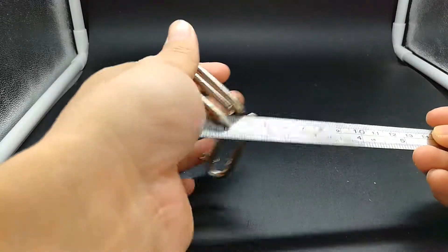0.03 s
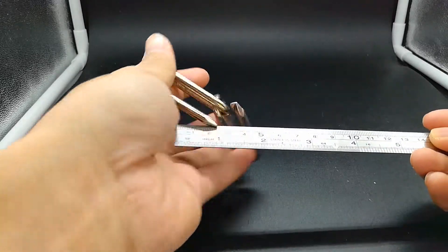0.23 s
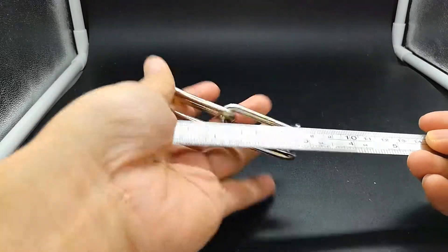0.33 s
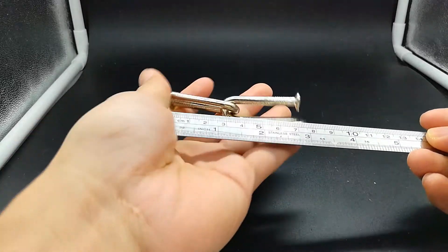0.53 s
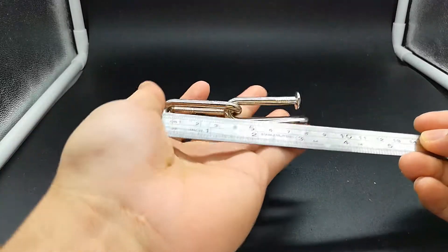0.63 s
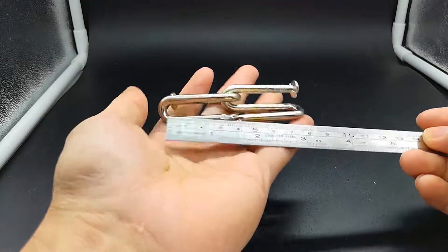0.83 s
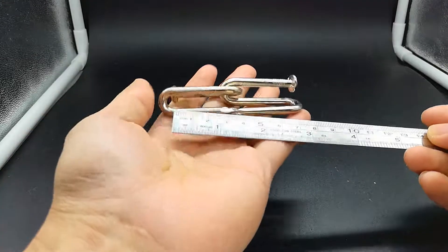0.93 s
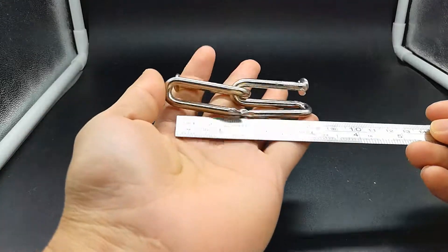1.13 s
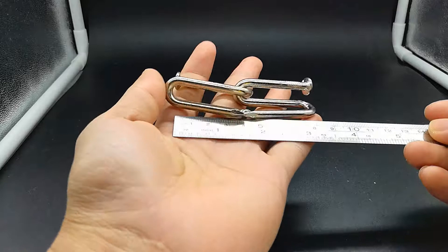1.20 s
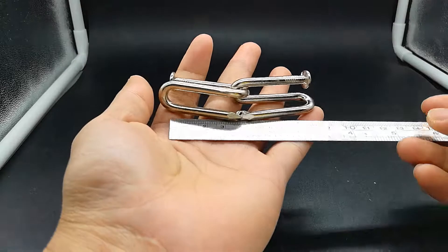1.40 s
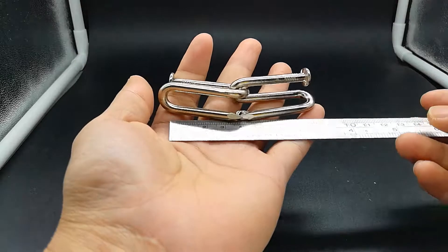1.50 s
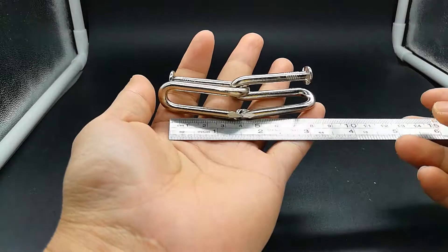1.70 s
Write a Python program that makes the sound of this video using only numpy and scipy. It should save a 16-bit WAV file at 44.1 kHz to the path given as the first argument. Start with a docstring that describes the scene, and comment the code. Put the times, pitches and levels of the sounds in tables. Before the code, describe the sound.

Close stereo pickup in a small, fairly dry space: thin gritty metal scrapes, a rapid burst of high steel clinks with short ringing, a few last scrapes, then quiet skin rubbing and dull bumps on a mat.

```python
"""Two linked steel puzzle loops are tipped onto a palm beside a steel ruler, close up in a small padded booth.
First they scrape along the ruler: tiny noisy slips hiss and keep the steel ringing.
Then they clink together and tap the ruler (sharp cracks and fading tones), with a few last scrapes.
Then the hand slides over the mat: shaped noise rustles, swishes and rubs, with a few dull bumps that die away.
A low uneven rumble and faint steady room noise lie underneath from start to end."""
import sys
import numpy as np
from scipy import signal
from scipy.fft import rfft, irfft
from scipy.io import wavfile

SR = 44100
rng = np.random.default_rng(int(sys.argv[2]) if len(sys.argv) > 2 else 0)


def bounce(signal):
    """Save signal as a 16-bit WAV file at the path given by the first command-line argument."""
    frames = np.transpose(np.atleast_2d(signal))
    limited = np.clip(frames, -1, 1)
    pcm = np.round(limited * 32767).astype(np.int16)
    wavfile.write(sys.argv[1], SR, pcm)


N = 77175  # length in samples

# In all tables, t60_s is the time to fade by 60 dB and balance_db is left minus right.
# Ringing tones of each piece of steel, before each blow scales their length and scatters their pitch:
# pitch_hz, level_db, t60_s, balance_db
HELD_LOOP_TONES = [(3990, -9.5, 0.18, -0.5), (5640, -7.5, 0.17, -7.5), (6960, -7.5, 0.14, -10.5),
                   (7470, -1, 0.0598, -10), (7530, 5.5, 0.0645, -9), (7620, -8, .08, -12.5),
                   (9243, -2, .12, -7.5), (9545, 2.5, 0.13, -6.5), (9400, -6, .08, -8),
                   (11550, -6, 0.035, -2), (12500, -9.5, .1, -4.5), (13880, -4.5, .08, 0),
                   (13960, -12.5, 0.039, 5), (15675, -7, .13, 7.5)]
SWINGING_LOOP_TONES = [(4114, -15.5, .13, -7), (5820, -1, 0.042, -12), (6950, -12.5, .07, -11.5),
                       (6990, 4.5, .075, -13), (9170, -10, 0.0992, -6), (9800, -1, .065, 3.5),
                       (9910, -6.5, 0.091, 0), (9960, -9, .07, -1), (10330, -15, .09, 0),
                       (12672, -8, 0.14, -10.5), (13690, -17.5, .08, -4.5), (13880, -10, .1, 2.5),
                       (15740, -10, .13, 2)]
SHANK_TONES = [(3840, -17.5, 0.047, 2), (6925, -2, 0.074, -10), (7200, -8, .04, -11.5),
               (9230, -6.5, 0.12, -4.5), (9530, -3, 0.021, -3), (10200, 5, 0.013, 2),
               (13690, -14.5, .07, -2), (13910, -13, .06, -3)]  # the short knobbed shank
RULER_TONES = [(1420, -2.5, 0.037, 2.5), (2122, -8.5, 0.043, 1), (2690, -7.5, 0.031, 1),
               (3686, 4.5, .04, -1), (4437, -8, 0.055, -2), (4820, -7, 0.037, -4.5), (5620, -4, 0.064, -15),
               (7020, -7, 0.15, -6.5), (7200, -4.5, 0.065, -11.5), (7280, -1, 0.083, -9.5),
               (7780, -1, .055, -13.5), (8570, -11, .07, -11), (9680, 2, .045, -10),
               (11350, 7.5, 0.044, -4), (14100, -9, .09, 2.5)]
SCRAPE_TONES = [(2030, -10.5, .05, 7.5), (2800, -11.5, .05, -3.5), (3620, -4, .06, -3),
                (4344, 0, 0.036, -0.5), (4500, 2, .045, -7.5), (5020, -1.5, 0.066, -7.5),
                (5765, -6, 0.055, -15), (6500, -3.5, .05, -9.5), (6953, -2, .05, -6.5),
                (7080, 0.5, 0.12, -8), (7520, -2.5, 0.0506, -10.5), (7872, -6.5, .05, -7),
                (8500, -3.5, .05, -8), (11505, -10, 0.054, -2)]  # tones that sliding keeps alive
# Blows of steel on steel: start_s, held_loop_db, swinging_loop_db, shank_db, ruler_db, crack_db,
# ring_length_share, ring_brightness_db_per_octave, crack_brightness_db_per_octave
CONTACTS = [(0.1975, -75, -77, -37, -71.5, -41.5, 1.0, 2, 0.5),
            (0.2204, -50.5, -62, -48, -68.5, -43.5, 0.93, 0.5, -3),
            (0.2252, -31, -61.5, -48, -57, -27.5, 0.87, 3.5, 6.5),
            (0.2338, -47.5, -42.5, -46, -69, -41, 0.37, 2.5, -7.5),
            (0.255, -50.5, -43, -58, -66, -33.5, .7, 0, 3.5),
            (0.2575, -50.5, -28, -50, -69.5, -39.5, .85, 1.5, 8.5),
            (0.269, -60, -44, -43, -68.5, -41.5, .7, 8, -2.5),
            (0.2953, -53, -35.5, -48, -53, -26.5, .7, -3, 1.5),
            (0.3005, -78, -69, -71, -57.5, -57.5, 0.21, 1, -10.5),
            (0.3174, -53, -53, -43, -67.5, -36, 0.69, -0.5, -0.5),
            (0.3838, -82, -81, -64, -41, -33, 0.96, -1, 0.5)]
# Colour of the crack: pitch_hz, level_db
CRACK_COLOUR = [(20, -110), (250, -47.5), (550, -33.5), (1000, -20.5), (2000, -15), (3000, -7),
                (4700, -3.5), (7500, 3.5), (8600, -3.5), (9600, 0), (12000, -2.5), (14500, -10),
                (16500, -16.5)]
# Steel sliding on steel: start_s, attack_s, release_s (fall of 60 dB), level_db, brightness_db_per_octave
SCRAPES = [(-.01, 0.0083, 0.23, -52.5, -2.5), (0.037, 0.0037, 0.055, -50.5, 0),
           (0.113, .014, 0.061, -55, -0.5), (0.131, 0.0062, 0.18, -53, -1), (0.326, 0.033, 0.12, -57.5, -5),
           (0.404, 0.041, .13, -55, -2), (.445, 0.028, 0.053, -57.5, 13)]
# Colour of the scraping hiss: pitch_hz, level_db
SCRAPE_COLOUR = [(20, -100), (400, -31.5), (1400, -24.5), (1750, -29), (2030, -4.5), (2300, -20.5),
                 (3300, -10.5), (4000, -4), (4400, -3.5), (4750, -7), (6000, -1.5), (7200, -0.5),
                 (8500, -5.5), (11500, -8.5), (16000, -23.5)]
# Left-right balance of the steel noise: pitch_hz, balance_db
STEEL_BALANCE = [(1000, 1), (2100, 0), (2800, 1.5), (4500, -9), (6200, -10), (8300, -11.5), (9800, -2.5),
                 (12000, -0.5), (14500, 0)]
# Rustle of the hand sliding over the mat: time_s, level_db
RUSTLE_LEVEL = [(.7, -97.5), (.77, -73.5), (.88, -69), (.96, -66), (1.0, -63.5), (1.03, -58.5),
                (1.12, -61.5), (1.21, -67), (1.29, -65), (1.38, -68), (1.43, -81.5), (1.5, -86),
                (1.57, -76), (1.68, -94)]
# Colour of the rustle: pitch_hz, level_db
RUSTLE_COLOUR = [(400, -38), (720, -14), (880, -15), (1030, -3), (1260, -1), (1420, -4), (1600, -3),
                 (2000, -10.5), (2350, -17.5), (2750, -26), (3400, -25), (4400, -31.5), (6000, -37)]
# Narrow band that sings within the rustle: time_s, pitch_hz, level_db
SWISH = [(.75, 1000, -93.5), (.9, 1051, -76.5), (1.05, 1170, -72.5), (1.22, 1150, -79.5), (1.26, 1066, -63),
         (1.3, 1172, -68.5), (1.43, 1209, -71), (1.49, 981.5, -78), (1.53, 1051, -75.5), (1.57, 1107, -73),
         (1.62, 1304, -74), (1.68, 1355, -95.5)]
# Soft brush as the hand meets the mat and drags on: time_s, level_db
BRUSH_LEVEL = [(.64, -100), (.68, -77.5), (.75, -73.5), (.81, -70), (.88, -73.5), (.95, -86.5), (1.1, -83),
               (1.25, -96), (1.35, -83), (1.47, -83.5), (1.6, -94)]
# Colour of the brush: pitch_hz, level_db
BRUSH_COLOUR = [(100, -15), (250, -5), (470, 6.5), (620, 0.5), (800, -6.5), (1100, -11.5), (1650, -14),
                (2500, -21.5), (3200, -9.5), (6000, -43.5)]
# Hollow rubbing of the hand: time_s, pitch_hz, level_db
RUB = [(0, 168.1, -84.5), (.24, 150.3, -77), (.29, 150.6, -68), (.36, 185.2, -66), (.42, 229.7, -86.5),
       (.62, 190.5, -86), (.7, 179.7, -68.5), (.8, 184.9, -71), (.88, 160.1, -104), (1.02, 179.7, -74),
       (1.13, 169.7, -72.5), (1.23, 238.1, -67.5), (1.33, 290.8, -65), (1.41, 260.4, -77),
       (1.5, 229.7, -72.5), (1.58, 169.8, -75.5), (1.72, 160, -90.5)]
# Dull bumps on the table: start_s, pitch_hz, level_db, t60_s
BUMPS = [(0.828, 52.7, -51.5, .2), (1.117, 136, -59, 0.15), (1.309, 132.5, -58.5, .14),
         (1.54, 75.8, -48.5, 0.1)]
# Low rumble: time_s, level_db
RUMBLE_LEVEL = [(0.0, -59.5), (0.072, -58), (0.146, -80), (0.184, -69), (0.516, -80), (0.544, -62),
                (0.666, -87), (0.764, -59.5), (1.038, -64.5), (1.066, -55.5), (1.272, -62), (1.456, -88),
                (1.554, -55.5), (1.676, -82), (1.706, -68), (1.75, -67)]
# Colour of the steady room noise: pitch_hz, level_db
FLOOR_COLOUR = [(15, -32), (25, -1), (64, -3), (108, -8.5), (157, -11), (229, -10.5), (607, -31),
                (1440, -25), (1560, -20.5), (2160, -34), (5880, -39), (8360, -33), (9570, -46),
                (11000, -41), (16000, -49)]
# Width of the room noise: pitch_hz, side_minus_mid_db
FLOOR_SIDE = [(60, -19.5), (110, -20), (200, -19), (380, -9), (700, 2.5), (1290, -18), (2380, -1),
              (4400, 0), (8120, -1), (15000, 2)]

RING_RISE_S, CRACK_RISE_S, CRACK_T60_S = 0.00091, 0.002, 0.046
PITCH_SCATTER = 0.0017  # largest random detuning per blow, as a share of the pitch
TWIN_SPLIT, TWIN_DB = 0.007, -5.5  # largest pitch gap (share) and level of the beating twin
MIC_PHASE_TURNS, MIC_PHASE_HZ = (-0.324, 0.243), 8000  # random phase range per microphone at this pitch
SCRAPE_GRAINS_PER_S, SCRAPE_SCATTER_DB, SCRAPE_RING_DB = 3100, 0.5, -2
RUSTLE_GRAINS_PER_S, RUSTLE_SCATTER_DB = 12000, 2
STEEL_LIKENESS, RUSTLE_LIKENESS = 0.4, 0.9  # share of noise power common to both microphones
SWISH_WIDTH_HZ, RUB_WIDTH_HZ = 230, 61
RUMBLE_HZ, RUMBLE_WIDTH_HZ = 47.3, 18
FLOOR_DB = -73
BOOTH_DB, BOOTH_T60_S, ROOM_DB, ROOM_T60_S = -7.5, 0.07, -23, 0.43
STEEL_LEAD_S, HAND_LEAD_S = 0.00013, 0.00009  # how much later the right side hears it
TOP_HZ = 15850


def undb(db):
    """Turn decibels into a gain."""
    return 10 ** (np.asarray(db) / 20)


def unit(x):
    """Scale a sound to rms 1."""
    return x / np.sqrt(np.mean(x ** 2) + 1e-30)


def clock():
    """Give the time of each sample in seconds."""
    return np.arange(N) / SR


def bins():
    """Give the pitch in Hz of each step of the spectrum."""
    return np.fft.rfftfreq(N, 1 / SR)


def curve(rows, axis=1):
    """Join one column of a table by straight lines in time."""
    rows = np.array(rows)
    return np.interp(clock(), rows[:, 0], rows[:, axis])


def on_bins(points):
    """Spread (pitch_hz, level_db) points over the whole spectrum."""
    hz, db = np.array(points).T
    return np.interp(np.log(bins() + 1), np.log(hz), db)


def colour(x, points, tilt_db=0):
    """Give a sound a spectrum, tilted in dB per octave, at rms 1."""
    octaves = np.log2(bins() + 1)
    return unit(irfft(rfft(x) * undb(on_bins(points) + tilt_db * octaves), N))


def sides(db):
    """Find left and right gains that keep the power for a level difference."""
    gains = undb(np.array([[.5], [-.5]]) * db)
    return gains / np.sqrt(np.mean(gains ** 2, axis=0))


def spread(likeness):
    """Make noise at two microphones, partly shared."""
    shared = rng.standard_normal(N)
    separate = rng.standard_normal((2, N))
    return np.sqrt(likeness) * shared + np.sqrt(1 - likeness) * separate


def grains(rate, scatter_db, likeness):
    """Make rough sliding out of dense tiny slips of uneven size."""
    noise = spread(likeness)
    happens = rng.random(N) < rate / SR
    return noise * happens * undb(scatter_db * rng.standard_normal(N))


def stroke(start, attack, release):
    """Shape one slide: a straight rise, then a fall of 60 dB over the release."""
    age = clock() - start
    return np.clip(age / attack, 0, 1) * 1000 ** (-np.maximum(age - attack, 0) / release)


def blow(start, rise, t60):
    """Shape one blow: a quick build-up and a free decay."""
    age = np.maximum(clock() - start, 0)
    return (1 - np.exp(-age / rise)) * np.exp(-np.log(1000) * age / t60)


def resonance(hz, width_hz):
    """Make noise in one narrow resonance whose centre may move."""
    noise = rng.standard_normal(N) + 1j * rng.standard_normal(N)
    offset_hz = np.fft.fftfreq(N, 1 / SR)
    slow = np.fft.ifft(np.fft.fft(noise) / (1 + (2 * offset_hz / width_hz) ** 2))
    turns = np.cumsum(hz * np.ones(N)) / SR
    return unit(np.real(slow * np.exp(2j * np.pi * turns)))  # slow noise moved up to the centre


def left_first(x, lead_s):
    """Let a sound reach the right microphone a little later."""
    delays_s = np.array([[0], [lead_s]])
    return irfft(rfft(x) * np.exp(-2j * np.pi * bins() * delays_s), N)


def room_noise():
    """Faint steady room noise, wider in the treble."""
    mid, side = colour(rng.standard_normal((2, N)), FLOOR_COLOUR)
    side = irfft(rfft(side) * undb(on_bins(FLOOR_SIDE)), N)
    return undb(FLOOR_DB) * (mid + np.array([[1], [-1]]) * side)


def rumble():
    """Low rumble of the table: a narrow noise resonance that swells and sinks."""
    return resonance(RUMBLE_HZ, RUMBLE_WIDTH_HZ) * undb(curve(RUMBLE_LEVEL))


def bumps():
    """Dull bumps on the table, each a low tone that dies away."""
    out = 0
    for start, hz, db, t60 in BUMPS:
        tone = np.sin(2 * np.pi * hz * (clock() - start))
        out = out - undb(db) * blow(start, 0.0022, t60) * tone  # first swing is downward
    return out


def rub():
    """Hollow rubbing of the hand: noise in a low resonance that wanders."""
    return resonance(curve(RUB), RUB_WIDTH_HZ) * undb(curve(RUB, axis=2))


def brush():
    """Skin softly brushing the mat: smooth coloured noise."""
    return undb(curve(BRUSH_LEVEL)) * colour(spread(RUSTLE_LIKENESS), BRUSH_COLOUR)


def swish():
    """A moving narrow band of noise that sings within the rustle."""
    return resonance(curve(SWISH), SWISH_WIDTH_HZ) * undb(curve(SWISH, axis=2))


def rustle():
    """Skin sliding over the mat: a dense stream of tiny slips."""
    slips = grains(RUSTLE_GRAINS_PER_S, RUSTLE_SCATTER_DB, RUSTLE_LIKENESS)
    band = list(RUSTLE_COLOUR) + [(RUSTLE_COLOUR[-1][0] * 2, -55)]  # fall further an octave above
    return colour(slips, band) * undb(curve(RUSTLE_LEVEL))


def hand():
    """The hand on the mat, with the rumble and bumps of the table."""
    return rustle() + brush() + rub() + rumble() + bumps() + swish()


def echoes(x, t60, db):
    """A dense decaying cloud of reflections, different at each microphone."""
    tail = rng.standard_normal((2, N)) * blow(.001, 0.00066, t60)
    return undb(db) * signal.fftconvolve(x, unit(tail) / np.sqrt(N), axes=1)[:, :N]


def off_centre(x):
    """The middle treble of the steel reaches the right microphone more strongly."""
    return irfft(rfft(x) * sides(on_bins(STEEL_BALANCE)), N)


def ring(tones, start, length, tilt_db, size=8192):
    """Struck steel rings in paired tones; each blow sets how long they last and randomly scatters their pitch."""
    hz, db, t60, balance_db = np.array(tones).T
    age = np.arange(size) / SR
    hz = hz * (1 + PITCH_SCATTER * rng.uniform(-1, 1, len(hz)))
    gains = sides(balance_db) * undb(db + tilt_db * np.log2(hz / np.median(hz)))
    decay = np.exp(-np.log(1000) * age / (t60[:, None] * length))
    fade = decay * (1 - np.exp(-age / RING_RISE_S))
    # each tone has a weaker twin, a little higher or lower, that beats with it
    split = TWIN_SPLIT * rng.choice([-1, 1], len(hz)) * rng.uniform(0.56, 1, len(hz))
    sound = 0
    for pitch, strength in ((hz, 1), (hz * (1 + split), undb(TWIN_DB))):
        start_turns = rng.random(len(hz))
        # the phase gap between the microphones can grow with pitch
        mic_turns = hz / MIC_PHASE_HZ * rng.uniform(*MIC_PHASE_TURNS, (2, len(hz)))
        phases = np.exp(2j * np.pi * (start_turns + mic_turns))
        waves = fade * np.exp(2j * np.pi * pitch[:, None] * age)
        sound = sound + strength * np.imag((gains * phases) @ waves)
    return np.pad(sound, ((0, 0), (int(start * SR), N)))[:, :N]


def scrapes():
    """Short gritty slides of the loops along the ruler, which hiss and keep the steel ringing."""
    slips = grains(SCRAPE_GRAINS_PER_S, SCRAPE_SCATTER_DB, STEEL_LIKENESS)
    hiss = off_centre(colour(slips, SCRAPE_COLOUR))
    ringing = unit(irfft(rfft(slips) * rfft(ring(SCRAPE_TONES, 0, 0.89, 0)), N))  # every slip rings
    steel = rfft(hiss + undb(SCRAPE_RING_DB) * ringing)
    octaves = np.log2(bins() + 1)
    out = 0
    for start, attack, release, db, tilt_db in SCRAPES:
        slide = unit(irfft(steel * undb(tilt_db * octaves), N))
        out = out + undb(db) * stroke(start, attack, release) * slide
    return out


def clinks():
    """Each contact makes a noisy crack and rings the two loops, the shank and the ruler."""
    out = 0
    noise = off_centre(spread(STEEL_LIKENESS))
    for start, held_db, swinging_db, shank_db, ruler_db, crack_db, length, tilt_db, crack_tilt_db in CONTACTS:
        crack = colour(noise, CRACK_COLOUR, crack_tilt_db) * blow(start, CRACK_RISE_S, CRACK_T60_S)
        out = out + undb(crack_db) * crack
        pieces = ((HELD_LOOP_TONES, held_db), (SWINGING_LOOP_TONES, swinging_db),
                  (SHANK_TONES, shank_db), (RULER_TONES, ruler_db))
        for tones, db in pieces:
            out = out + undb(db) * ring(tones, start, length, tilt_db)
    return out


def scene():
    """Steel with its booth and room echoes, then the hand, over faint room noise."""
    steel = left_first(clinks() + scrapes(), STEEL_LEAD_S)
    booth = echoes(steel, BOOTH_T60_S, BOOTH_DB)
    room = echoes(steel, ROOM_T60_S, ROOM_DB)
    return steel + booth + room + left_first(hand(), HAND_LEAD_S) + room_noise()


def record(dry):
    """The recorder steeply cuts everything above its top pitch."""
    top_cut = signal.ellip(10, .2, 80, TOP_HZ, fs=SR, output="sos")
    return signal.sosfilt(top_cut, dry)


dry = scene()
out = record(dry)
bounce(out)
```